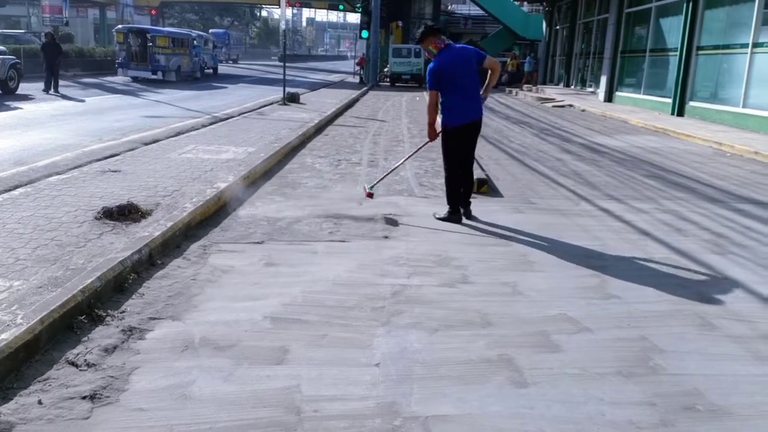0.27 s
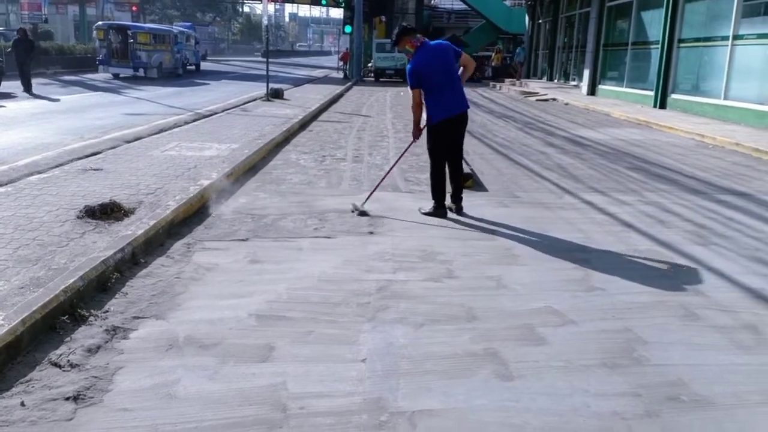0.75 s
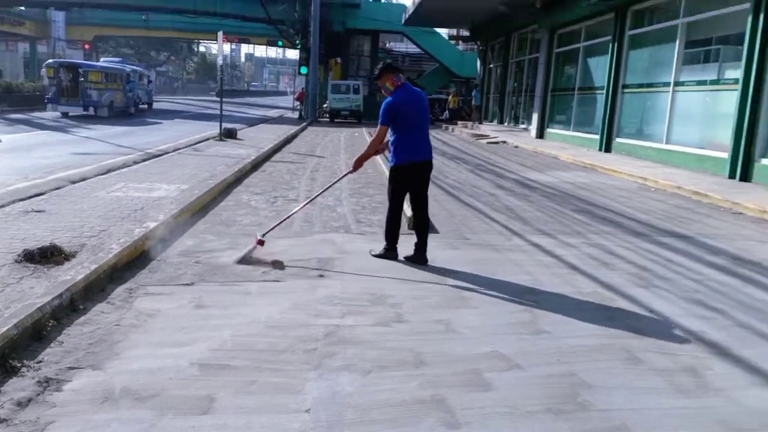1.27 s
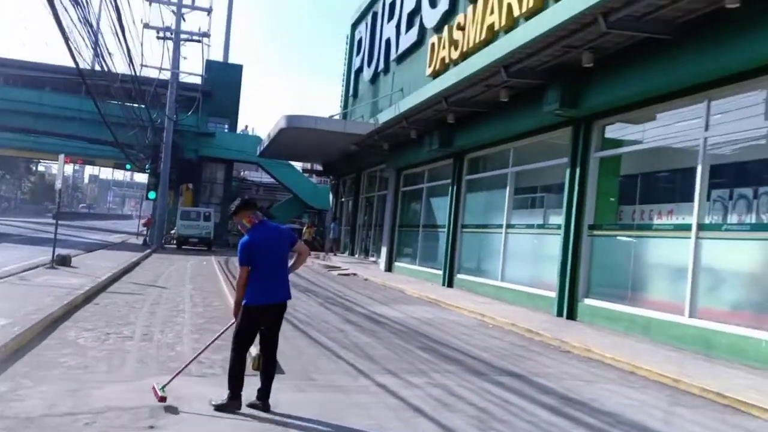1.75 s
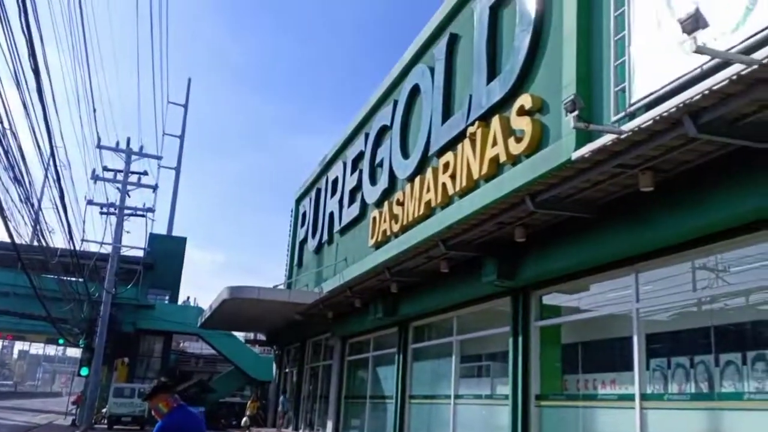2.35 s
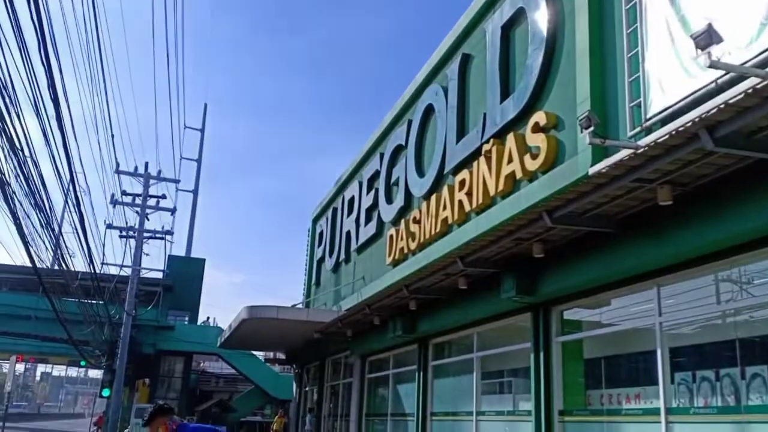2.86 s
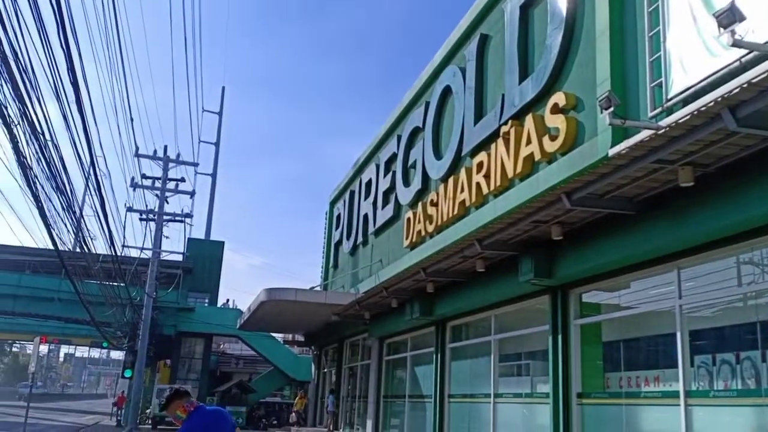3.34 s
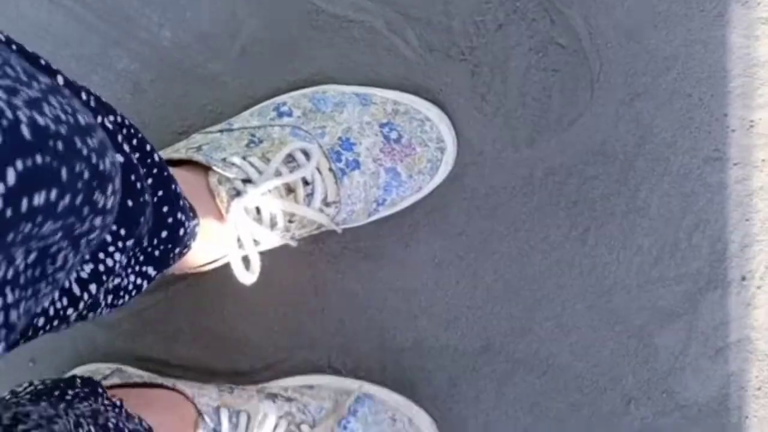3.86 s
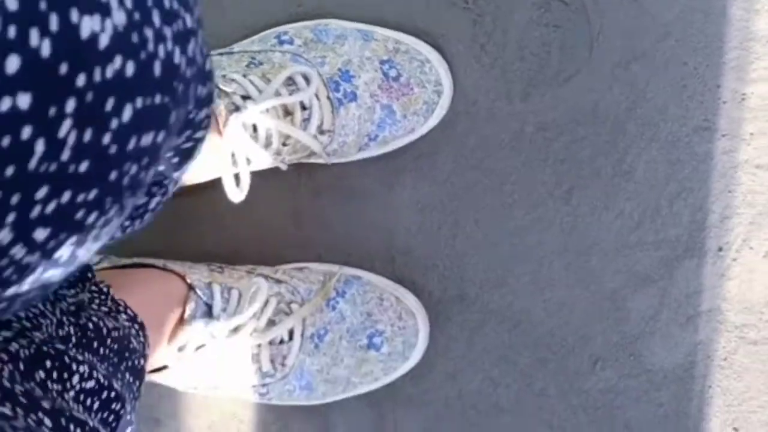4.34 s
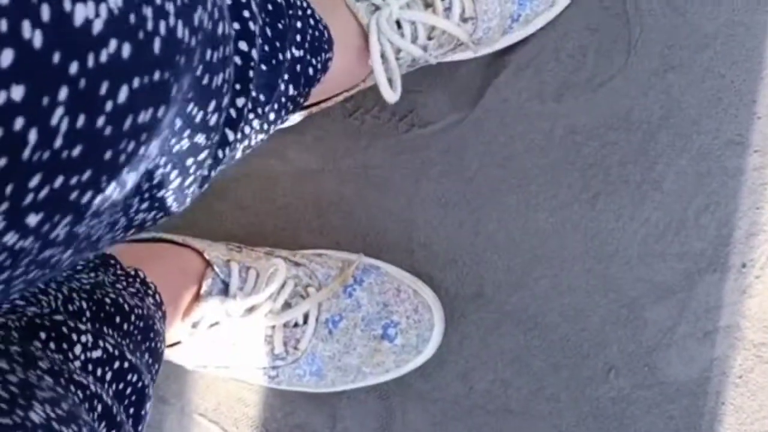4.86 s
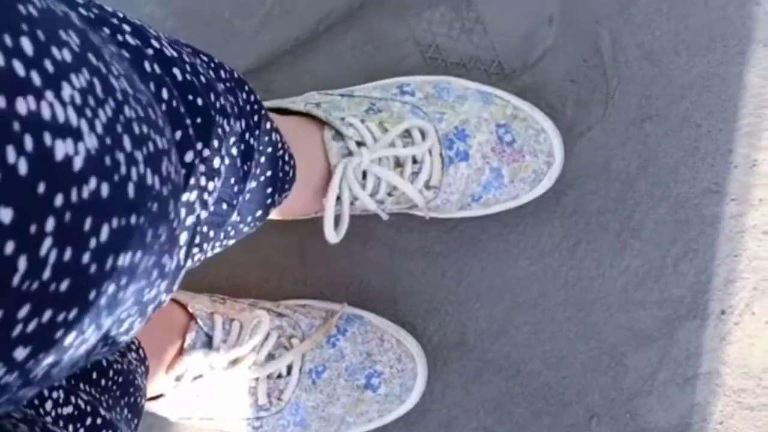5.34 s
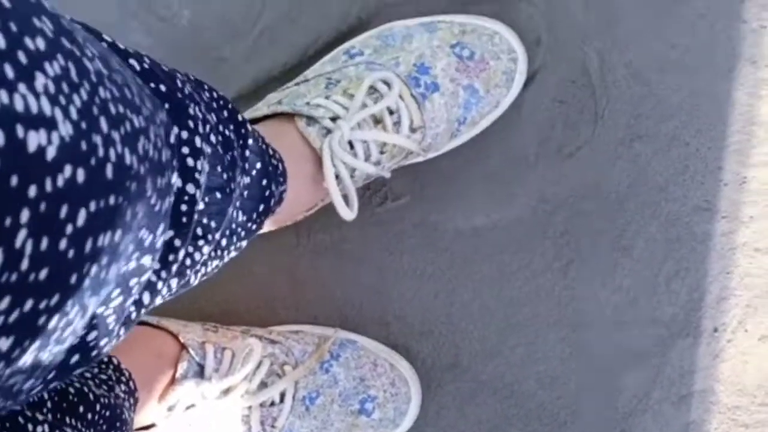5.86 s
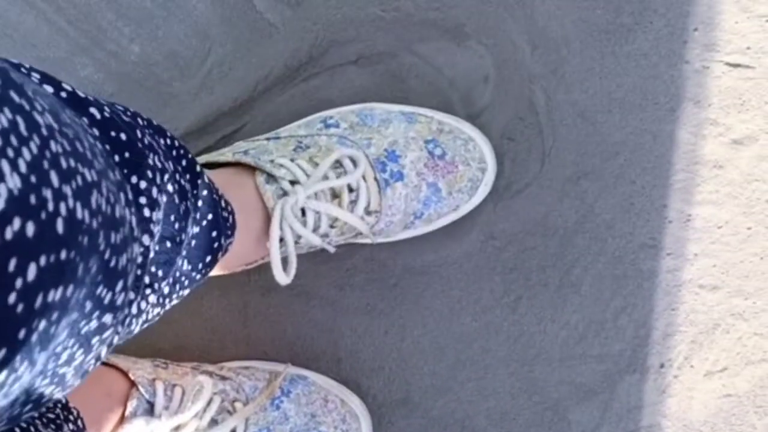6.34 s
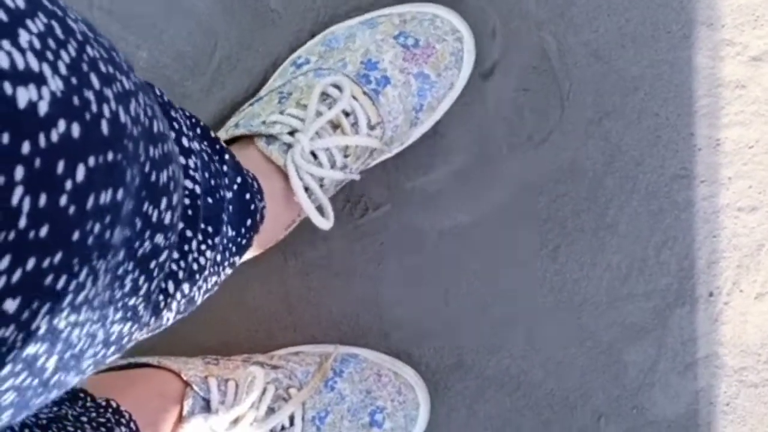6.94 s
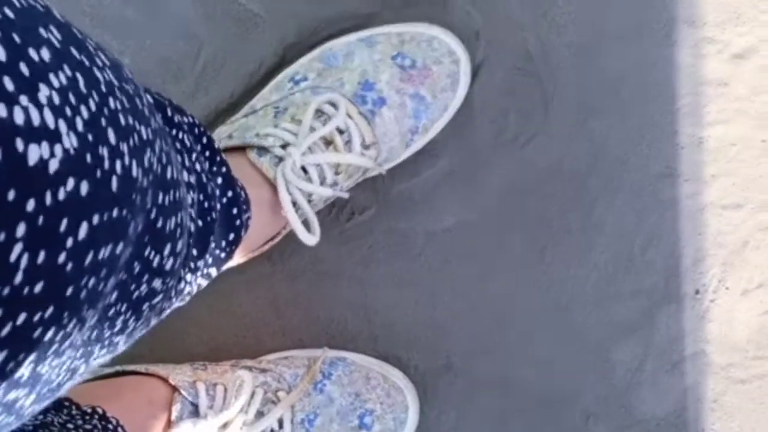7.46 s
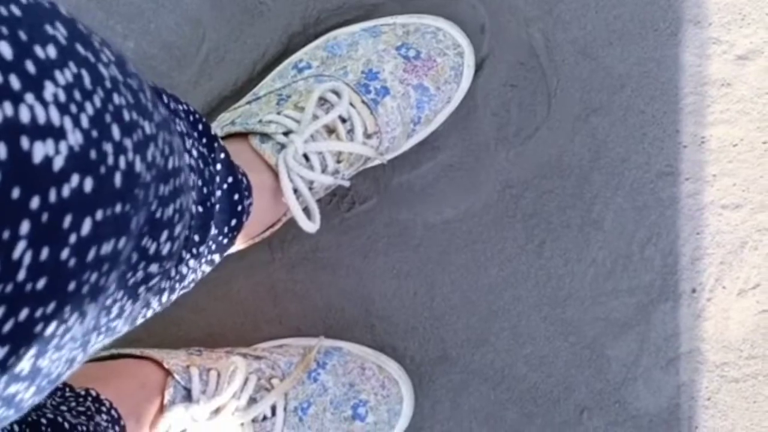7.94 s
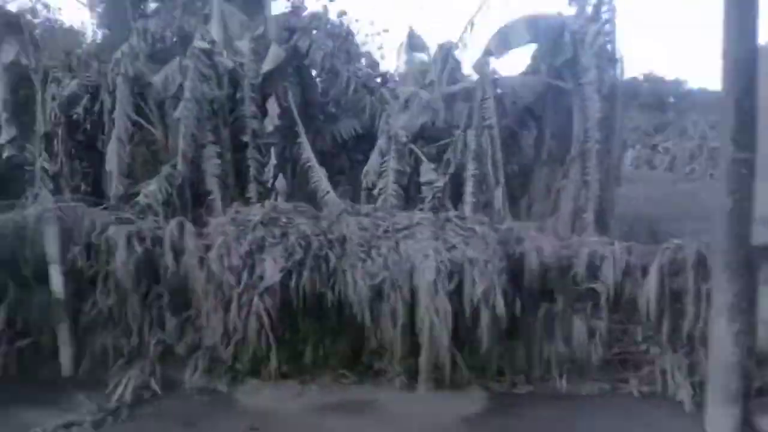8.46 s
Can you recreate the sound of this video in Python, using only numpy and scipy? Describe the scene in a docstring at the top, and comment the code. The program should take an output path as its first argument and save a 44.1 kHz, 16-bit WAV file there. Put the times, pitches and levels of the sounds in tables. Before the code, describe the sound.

City road rumble with gritty ticks and a brake squeal fades out; a motorcycle putters past; then a vehicle drones on over two bumps.

```python
"""Far engines and tyres, two bursts of gritty ticks and a brake squeal open a busy road heard from the pavement.
After a silence a single-cylinder motorcycle putters by and eases off; after another, a vehicle drones
along with a thin whine and thumps over two bumps, still running at the end.
Traffic is shaped noise; the exhaust and bumps are short damped pulses; drone, squeal and farther
engines are unsteady tones; grit is decaying noise."""
import sys
import numpy as np
from scipy import signal
from scipy.fft import rfft, irfft, next_fast_len
from scipy.io import wavfile
from scipy.ndimage import uniform_filter1d

SR = 44100
rng = np.random.default_rng(int(sys.argv[2]) if len(sys.argv) > 2 else 0)


def store_pcm(level_fs):
    """Save levels as 16-bit WAV."""
    pcm = np.round(np.clip(level_fs, -1, 1) * 32767).astype(np.int16)
    wavfile.write(sys.argv[1], SR, np.atleast_2d(pcm).T)


N = 383229
TIME = np.arange(N) / SR
WINDOW, HOP = 2048, 512
FRAMES = np.arange(N // HOP + 5) * HOP / SR  # s

# Three passages: start_s, fade_in_s, fall_from_s, zero_gain_s
PASSAGES = [(-.3, .15, 1.96, 3.47), (3.505, 0.2, 7.204, 8.09), (8.179, 0.19, 9, 10)]
FADE_IN_POWER, CUT_GAIN = 2.16, 0.083  # gentle start; fall is cut off at this gain

# Motorcycle rate: slows to CRUISE_HZ at lift-off, then runs down to idle
LIFT_S, CRUISE_HZ, SAG_HZ_PER_S, IDLE_HZ, RUN_DOWN_S = 5.408, 43.54, 1.127, 33.84, .663
# Exhaust: time_s, engine_load_0_to_1, level_db
EXHAUST_LOAD = [(3.7, 0.98, -35.5), (4.25, 0.99, -26.5), (4.9, 0.94, -25), (5.25, 0.96, -29),
                (5.45, 0.82, -23), (5.85, 0.2, -24.5), (6.15, 0, -27.5), (6.5, 0, -22.5), (7.08, 0, -24),
                (7.3, 0.24, -28.5), (7.7, 0.82, -30)]
# Firings that fail: time_s
MISFIRES = [4.409, 6.807]
POP_HZ, POP_PEAK_MS = (131.4, 253.7), (3.4, 6.48)  # (coasting, full load); onset-to-peak time
# Motorcycle rush, rows rumble, roar, hiss: loudest_s, level_db, approach_s, retreat_s
PASS_BY = [(6.86, -29.5, 3.3, 0.91), (5.78, -30, 1.08, 0.88), (6.21, -45.5, 1.2, 0.78)]

# Vehicle drone and whine: nominal_pitch_hz, level_db, full_swell_s
DRONE = [(75.5, -29.5, 8.42), (145, -34.5, 8.35), (230, -31, 8.62), (850, -41, 8.23), (1400, -47, 8.3),
         (3980, -61, 8.58), (5394, -60, 8.8)]
# Bump thumps: time_s, level_before_low_cut_db, pitch_hz
BUMPS = [(8.462, -14.5, 260), (8.467, -18, 170), (8.4711, -12.5, 380), (8.654, -16, 402), (8.658, -12, 258)]
# Brake modes: nominal_pitch_hz, width_hz, relative_level_db
BRAKE = [(2738, 14, 0), (2792, 22, -2), (2836, 20, -2), (2892, 20, -5), (3040, 14, -1), (3095, 16, -4),
         (3240, 50, -15), (3370, 50, -8), (3655, 14, -11), (3722, 14, -11), (6750, 250, -22),
         (10700, 250, -26)]
# Grit ticks: time_s, relative_peak_db
TICKS = [(1.514, -27), (1.52, -31), (1.926, -23), (1.931, -28), (1.937, -34), (1.944, -27.5)]
# Tick spectrum: frequency_hz, relative_level_db
TICK_COLOUR = [(2000, -36), (4200, -17), (5300, 11.5), (7500, -8), (11000, -9.5), (15500, -15)]
# Farther engines: start_s, length_s, first_hz, last_hz, level_db
HUMS = [(-.3, 1.27, 90, 76.5, -38), (.9, 0.62, 77, 70.3, -33), (1.55, 0.64, 137, 139.3, -34),
        (1.9, 0.49, 72, 72.5, -39), (2.2, 0.26, 182, 164.4, -34.5), (2.5, 0.44, 73, 81.8, -31),
        (3.751, 1.12, 97, 88, -35.5), (4.6, 0.96, 89, 82.8, -43)]
# Squeaks of other brakes: start_s, length_s, pitch_hz, level_db
SQUEAKS = [(1.98, .12, 11000, -60), (2.273, .1, 11100, -62), (6.93, 0.31, 5600, -50.5)]

# Rumble, roar and hiss bands: low_hz, high_hz
BANDS = [(40, 350), (400, 2500), (4000, 15000)]
# Traffic spectra of passages 1, 2, 3: frequency_hz, relative_level_db
ROAD_COLOUR = [(15, -53), (25, -24), (43, -35), (64, -8), (86, -0.5), (198, -4.5), (274, -9), (445, -13),
               (722, -14.5), (950, -16), (1140, -22), (2170, -18), (3340, -26), (5280, -24), (7500, -41.5),
               (15500, -47)]
PASSING_COLOUR = [(15, -68.5), (25, -27.5), (43, -25), (62, -14), (96, 3), (260, 1), (368, -6.5),
                  (509, -14), (648, -19), (945, -18.5), (1170, -27.5), (1650, -23), (2170, -19.5),
                  (3260, -32.5), (5430, -33), (7700, -49), (13000, -53), (13700, -49.5), (14400, -53.5),
                  (15500, -55)]
RIDE_COLOUR = [(15, -56), (25, -41.5), (69, -2), (148, -2), (188, -4.5), (457, -16), (762, -25.5),
               (871, -25.5), (1140, -34), (1410, -34), (1620, -36), (2060, -26.5), (3170, -41.5),
               (4040, -43.5), (5500, -44), (7500, -56.5), (15500, -62)]
# Base traffic levels of passages 1 and 3: rumble_db, roar_db, hiss_db
ROAD_DB = (-32, -36.5, -50.5)
RIDE_DB = (-28, -38, -61.5)
RIDE_HISS_DB_PER_S = 6.5
# Brief traffic surges: time_s, half_width_s, extra_hiss_db, extra_roar_db
SURGES = [(.45, 0.1, 2, 1.6), (.85, 0.19, 2.5, .3), (6.05, .1, 1.4, 1), (6.63, 0.13, 3.5, 2.1),
          (7.25, 0.14, 1, -1)]
# Bearing of the nearest traffic: time_s, left_ear_lead_ms, left_minus_right_db
BEARING = [(0, -0.46, 0), (2.2, -0.39, -0.5), (3.7, -0.26, -0.2), (4.4, 0.32, 0.1), (5.0, 0.23, 0),
           (5.6, -0.078, -0.4), (6.4, 0.082, -0.8), (8.0, 0.44, 1), (8.15, -0.26, 5)]
EDGE_HZ = 15750


def motorcycle(spread_hz=7, jitter_ms=.09, uneven_db=1.13, rasp=0.042, echo=0.14, echo_s=0.01262):
    """One exhaust pop per firing, higher and longer under load; engine rush throbs in step."""
    turns = firing_turns()
    fires_s = TIME[1:][np.diff(np.floor(turns)) > 0]
    pops = np.zeros(N)
    for fire_s, (size, tone, late) in zip(fires_s, rng.standard_normal((len(fires_s), 3))):
        load = follow(EXHAUST_LOAD, fire_s)[0]
        hz = np.interp(load, [0, 1], POP_HZ)
        peak_ms = np.interp(load, [0, 1], POP_PEAK_MS)
        misfires = np.min(abs(np.array(MISFIRES) - fire_s)) < .012
        burn = .2 if misfires else 1
        start_s = fire_s + (jitter_ms * late - peak_ms) / 1000
        add(pops, start_s, burn * amp(uneven_db * size) * pop(hz + spread_hz * tone, peak_ms))
    pops += echo * np.interp(TIME - echo_s, TIME, pops)  # thrown back by the shop front
    pops = low_cut(pops, edge_hz=82)
    pops /= np.sqrt(abs(uniform_filter1d(pops ** 2, size=12000)) + 1e-9)  # even running rms
    exhaust = pops * amp(follow(EXHAUST_LOAD, TIME)[1])
    rush_levels_db = [pass_by(*row) for row in PASS_BY]
    rush = traffic(rush_levels_db, PASSING_COLOUR, direct=0.22, patchy_db=1)
    throb = 1 + rasp * np.cos(2 * np.pi * (turns - .1))
    return place(exhaust) + rush * throb


def firing_turns():
    """Integrates firing rate to a running count, zero where the rider lifts off."""
    since_s = TIME - LIFT_S
    labouring_hz = CRUISE_HZ - SAG_HZ_PER_S * since_s
    running_down_hz = IDLE_HZ + (CRUISE_HZ - IDLE_HZ) * np.exp(-since_s / RUN_DOWN_S)
    turns = np.cumsum(np.where(since_s < 0, labouring_hz, running_down_hz)) / SR
    return turns - np.interp(LIFT_S, TIME, turns)


def pop(hz, peak_ms):
    """Pressure puff that swells and dies within a few cycles of its pipe or panel."""
    t = np.arange(SR // 30) / SR
    u = t * 1000 / peak_ms
    envelope = (u * np.exp(1 - u)) ** 4
    return -envelope * np.cos(2 * np.pi * hz * (t - peak_ms / 1000))


def pass_by(nearest_s, db, approach_s, retreat_s):
    """Level of a passing source, falling with distance either side of its nearest point."""
    away = (FRAMES - nearest_s) / np.where(FRAMES < nearest_s, approach_s, retreat_s)
    return db - 10 * np.log10(1 + away ** 2)


def ride(waver=.004, flutter=0.26, sag_per_s=.04, in_tune_s=8.5):
    """Slightly sagging engine drone and whine over road noise; damped panel thumps at two bumps."""
    start_s = PASSAGES[2][0]
    speed = 1 - sag_per_s * (TIME - in_tune_s) + waver * wander(11).real
    clock_s = np.cumsum(speed) / SR
    body = np.zeros(N)
    for hz, db, full_s in DRONE:
        swell = np.interp(TIME, [start_s, full_s], [0, 1]) ** 2
        tone = (1 + flutter * wander(23)) * np.exp(2j * np.pi * hz * clock_s)
        body += amp(db) * swell * unit(tone.real)
    thumps = np.zeros(N)
    for bump_s, db, hz in BUMPS:
        add(thumps, bump_s - .002, amp(db) * pop(hz, peak_ms=2.2))
    rumble_db, roar_db, hiss_db = RIDE_DB
    rising_hiss_db = hiss_db + RIDE_HISS_DB_PER_S * np.maximum(FRAMES - start_s, 0)
    noise = traffic((rumble_db, roar_db, rising_hiss_db), RIDE_COLOUR, direct=0.16, patchy_db=2.5)
    return place(body + low_cut(thumps, edge_hz=100)) + noise


def brake(start_s=2.81, attack_s=0.047, level_db=-31.0, fall_db_per_s=8, waver=0.0024):
    """Cluster of unsteady brake modes that sets in and eases, reaching each ear by many paths."""
    clock_s = np.cumsum(1 + waver * wander(21).real) / SR
    ears = []
    for _ in range(2):
        squeal = np.zeros(N)
        for hz, width_hz, db in BRAKE:
            mode = wander(width_hz) * np.exp(2j * np.pi * hz * clock_s)
            squeal += amp(db) * mode.real
        ears.append(unit(squeal))
    age_s = np.maximum(TIME - start_s, 0)
    return np.array(ears) * amp(level_db - fall_db_per_s * age_s) * np.minimum(age_s / attack_s, 1)


def grit(level_db=-1.5, decay_s=0.0045):
    """Tiny bright cracks of grit on concrete: decaying coloured noise, independent per ear."""
    t = np.arange(1024) / SR
    gain = colour(TICK_COLOUR, np.fft.rfftfreq(len(t), 1 / SR))
    out = np.zeros((2, N))
    for tick_s, db in TICKS:
        for ear in out:
            burst = rng.standard_normal(len(t)) * np.exp(-t / decay_s)
            crack = irfft(rfft(burst) * gain)
            add(ear, tick_s, crack[:len(t) // 2] / abs(crack).max() * amp(db + level_db))
    return out


def hum(start_s, length_s, first_hz, last_hz, db, flutter=0.29):
    """Strongest firing tone of a farther engine, gliding and throbbing as it swells and fades."""
    along = np.clip((TIME - start_s) / length_s, 0, 1)
    hz = first_hz + (last_hz - first_hz) * along
    tone = (1 + flutter * wander(8.7)) * np.exp(2j * np.pi * np.cumsum(hz) / SR)
    return unit(tone.real) * amp(db) * np.sin(np.pi * along)


def squeaks(width_hz=70):
    """Faint narrow-band whistles of other brakes that swell and fade."""
    out = np.zeros(N)
    for start_s, length_s, hz, db in SQUEAKS:
        swell = np.sin(np.pi * np.clip((TIME - start_s) / length_s, 0, 1))
        whistle = wander(width_hz) * np.exp(2j * np.pi * hz * TIME)
        out += amp(db) * swell * unit(whistle.real)
    return place(out)


def traffic(levels_db, spectrum, direct, patchy_db, spacing_m=0.19):
    """Street noise: diffuse sound from all round plus direct sound from the nearest vehicles."""
    hz = np.fft.rfftfreq(WINDOW, 1 / SR)
    shape = (len(FRAMES), len(hz))
    a, b, near = rng.standard_normal((3, *shape)) + 1j * rng.standard_normal((3, *shape))
    lead_ms, tilt_db = (c[:, None] for c in follow(BEARING, FRAMES))
    coherence = .93 * np.sinc(2 * hz * spacing_m / 343)  # diffuse field between the ears
    phase = 2 * np.pi * hz * lead_ms / 1000
    direct = np.clip(direct, 0, .9)
    diffuse = np.array([a, coherence * a + np.sqrt(1 - coherence ** 2) * b])
    beam = np.array([near, near * np.exp(-1j * phase)])
    z = np.sqrt(1 - direct) * diffuse + np.sqrt(direct) * beam
    # offset the gain that correlation adds to the sum of the ears
    z /= np.sqrt(1 + (1 - direct) * coherence + direct * np.cos(phase) * np.exp(-hz / 3000))

    base = colour(spectrum, hz)
    more_hiss_db, more_roar_db = surge()
    extras_db = (0 * FRAMES, more_roar_db, more_hiss_db)
    band_gains_db = []
    for db, extra_db, (low_hz, high_hz) in zip(levels_db, extras_db, BANDS):
        band_power = np.sum(base[(hz >= low_hz) & (hz < high_hz)] ** 2)
        band_gains_db.append(db + extra_db - 10 * np.log10(band_power))
    to_roar = np.clip((hz - 280) / 200, 0, 1)
    to_hiss = np.clip((hz - 2600) / 1200, 0, 1)
    field_db = np.transpose(band_gains_db) @ np.array([1 - to_roar, to_roar - to_hiss, to_hiss])
    patches = uniform_filter1d(rng.standard_normal(shape), size=6, axis=0)
    patches = unit(uniform_filter1d(patches, size=30, axis=1))
    z *= base * amp(field_db + patchy_db * patches) * amp([tilt_db / 2, -tilt_db / 2])
    ears = signal.istft(z.swapaxes(1, 2), nperseg=WINDOW, noverlap=WINDOW - HOP)[1]
    return np.sqrt(3) * ears[:, :N]


def surge():
    """Sums Gaussian level swells of hiss and roar (dB)."""
    total_db = np.zeros((2, len(FRAMES)))
    for peak_s, width_s, hiss_db, roar_db in SURGES:
        total_db += np.outer((hiss_db, roar_db), np.exp(-((FRAMES - peak_s) / width_s) ** 2))
    return total_db


def place(x):
    """Delays and tilts a source between the ears by the traffic bearing."""
    lead_ms, tilt_db = follow(BEARING, TIME)
    ears = [np.interp(TIME + side * lead_ms / 1000, TIME, x) * amp(side * tilt_db)
            for side in (.5, -.5)]
    return np.array(ears)


def low_cut(x, edge_hz):
    """Smooth high-pass: little remains below edge_hz."""
    hz = np.fft.rfftfreq(N, 1 / SR)
    return irfft(rfft(x) * (1 - 1 / (1 + (hz / edge_hz) ** 2) ** 2) ** 4, N)


def fade(start_s, rise_s, fall_from_s, zero_gain_s):
    """Passage gain: quick curved rise, straight fall, then a short cut to silence."""
    rise = np.clip((TIME - start_s) / rise_s, 0, 1) ** FADE_IN_POWER
    fall = np.clip((zero_gain_s - TIME) / (zero_gain_s - fall_from_s), 0, 1)
    return rise * fall * uniform_filter1d(1. * (fall > CUT_GAIN), size=400)


def wander(rate_hz):
    """Slow complex random signal, rms 1, with a Gaussian spectrum around zero."""
    hz = np.fft.fftfreq(next_fast_len(N), 1 / SR)
    spectrum = np.exp(-(hz / rate_hz) ** 2 + 2j * np.pi * rng.random(len(hz)))
    return unit(np.fft.ifft(spectrum)[:N])


def amp(db):
    """Decibels to gain."""
    return 10 ** (np.asarray(db) / 20)


def unit(x):
    """Scales to rms 1."""
    return x / np.sqrt(np.mean(abs(x) ** 2) + 1e-20)


def follow(rows, t):
    """Interpolates every column of a curve table at times t."""
    s, *columns = np.transpose(rows)
    return [np.interp(t, s, c) for c in columns]


def colour(points, hz):
    """Spectrum table to gain, interpolated in dB over log frequency."""
    f, db = np.transpose(points)
    return amp(np.interp(np.log(hz + 1), np.log(f), db))


def add(mix, start_s, sound):
    """Mixes a sound in place at start_s."""
    part = mix[max(round(start_s * SR), 0):][:len(sound)]
    part += sound[:len(part)]


def scene():
    """Sums the three passages, each under its own fade gain."""
    others = place(sum(hum(*row) for row in HUMS)) + squeaks()
    road = traffic(ROAD_DB, ROAD_COLOUR, direct=0.26, patchy_db=0.86) + grit() + brake()
    passages = (road + others, motorcycle() + others, ride())
    return sum(fade(*row) * passage for row, passage in zip(PASSAGES, passages))


def record(dry):
    """Linear-phase low-pass at EDGE_HZ."""
    taps = signal.firwin(511, EDGE_HZ, window=("kaiser", 9), fs=SR)
    return signal.oaconvolve(dry, taps[None], "same")


dry = scene()
out = record(dry)
store_pcm(out)
```